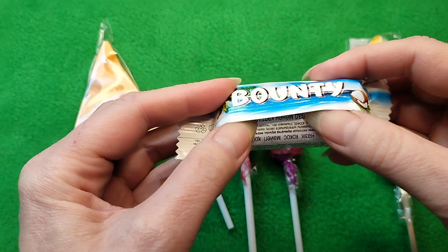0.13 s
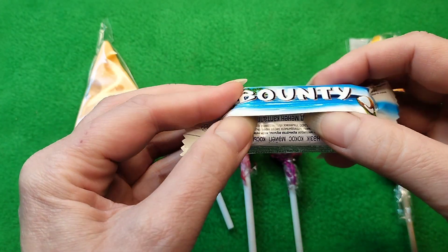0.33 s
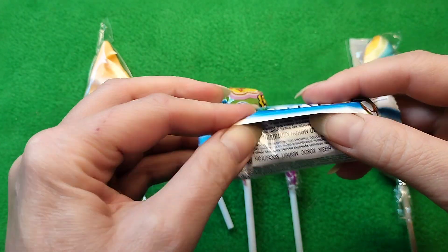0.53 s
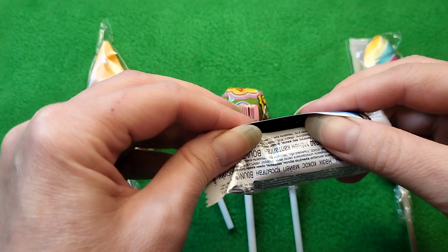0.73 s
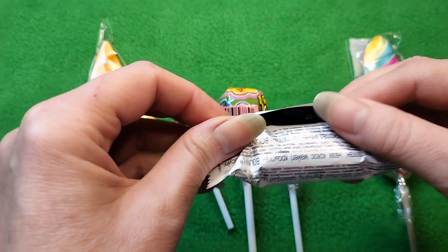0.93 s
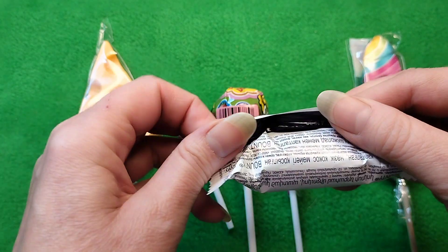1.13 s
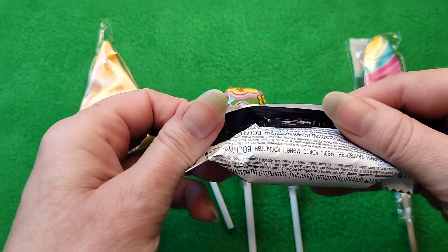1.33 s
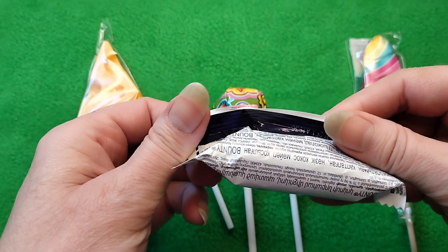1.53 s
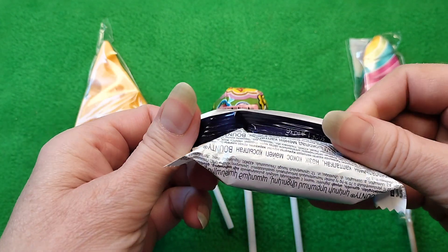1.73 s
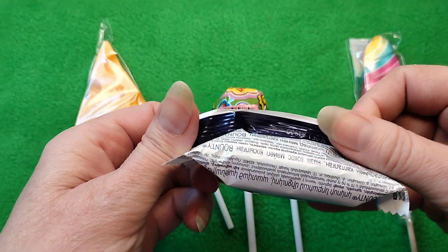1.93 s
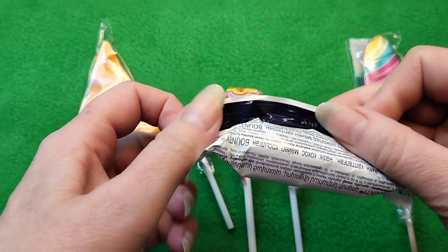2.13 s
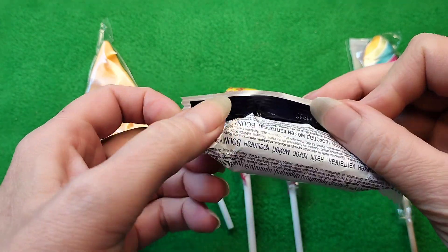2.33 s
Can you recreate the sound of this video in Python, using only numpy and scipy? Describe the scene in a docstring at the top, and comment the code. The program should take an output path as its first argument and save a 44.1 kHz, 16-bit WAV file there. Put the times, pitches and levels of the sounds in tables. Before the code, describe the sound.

A plastic candy wrapper crinkles close to the microphone as fingers pinch and turn it. Scattered sharp snaps thicken from about 0.4 seconds and are loudest between 0.6 and 1.1, with faint rustling and occasional soft pops. The crackling continues unevenly until 1.7, almost stops, then returns in a flurry from 2.0 to 2.2 seconds. Light rubbing and a couple of small ticks follow. The room is quiet.

```python
"""Candy wrapper, close up

Fingers turn and pinch a plastic-wrapped candy bar close to a stereo microphone in a quiet room.
Creases buckle with sharp snaps, each ringing the film beside it; now and then a whole panel pops
through with a soft thump. In between, the film crackles and rubs faintly, over a low mains hum."""
import sys
import numpy as np
from scipy import signal
from scipy.fft import rfft, irfft
from scipy.io import wavfile

SR = 44100
rng = np.random.default_rng(int(sys.argv[2]) if len(sys.argv) > 2 else 0)


def log_audio(samples):
    """Write samples as a 16-bit WAV file to the path given in sys.argv[1]."""
    # one column per channel
    frames = np.atleast_2d(samples).T
    # limit to full scale, then quantise
    limited = np.clip(frames, -1, 1)
    pcm = np.round(limited * 32767).astype(np.int16)
    wavfile.write(sys.argv[1], SR, pcm)


N = 110250


def from_db(db):
    """Decibels to gain."""
    return 10 ** (np.asarray(db) / 20)


def unit(x):
    """Scale to a mean energy of one per channel."""
    return x / np.sqrt(np.mean(np.sum(x ** 2, axis=-1)) + 1e-24)


def panned(db):
    """Constant-power gains, the left db above the right."""
    gains = from_db([[db / 2], [-db / 2]])
    return gains / np.sqrt(np.mean(gains ** 2))


def colour(x, points):
    """Minimum-phase filter through (frequency [Hz], gain [dB]) points."""
    size = 4096
    hz, db = np.transpose(points)
    gain = from_db(np.interp(np.log(np.fft.rfftfreq(size, 1 / SR) + 1), np.log(hz), db))
    cepstrum = irfft(np.log(gain))
    cepstrum[1:size // 2] *= 2
    cepstrum[size // 2 + 1:] = 0
    response = irfft(np.exp(rfft(cepstrum)))[:size // 2]
    return signal.fftconvolve(x, response[None], axes=-1)[:, :x.shape[-1]]


def resonate(x, hz, q):
    """One resonance with gain one at its peak."""
    return signal.lfilter(*signal.iirpeak(hz, max(q, 1), fs=SR), x)


def cut(x, hz, kind):
    """Second-order low- or high-pass."""
    return signal.lfilter(*signal.butter(2, hz, kind, fs=SR), x)


def add(out, time_s, sound):
    """Mix a sound in at a time."""
    start = int(np.clip(time_s * SR, 0, N - 1))
    out[:, start:start + sound.shape[-1]] += sound[:, :N - start]


# still air around the microphone: (frequency [Hz], gain [dB])
AIR_COLOUR = [(25, -16), (150, -1), (400, -0.5), (1000, -11), (3000, -27.5), (16000, -33.5)]


def room_tone():
    """Still air and a faint mains hum, a little to the left."""
    air_db, hum_db, hum_hz = -88.5, -83, 99.8
    air = np.sqrt(N) * unit(colour(rng.standard_normal((2, N)), AIR_COLOUR))
    hum = np.sqrt(2) * np.sin(2 * np.pi * hum_hz * np.arange(N) / SR)
    return from_db(air_db) * air + from_db(hum_db) * panned(db=6.5) * hum


# film crackling and sliding close to the microphone: (time [s], level [dB])
HANDLING_LEVEL = [(0, -61), (.055, -73), (.1, -67), (.22, -67), (0.279, -60), (0.33, -86), (.372, -80),
                  (0.44, -55), (.52, -70), (0.659, -50), (.78, -65), (.845, -70), (0.888, -56), (.99, -61),
                  (1.042, -53), (1.13, -75), (1.28, -66), (1.38, -58), (1.5, -60), (1.55, -70), (1.68, -63),
                  (1.75, -86), (1.82, -74), (1.97, -92), (2.07, -70), (2.17, -54), (2.299, -66),
                  (2.36, -58), (2.439, -69), (2.5, -55)]
# tone of that crackle and hiss: (frequency [Hz], gain [dB])
CRACKLE_COLOUR = [(200, -19.5), (600, -20.5), (950, -4), (1600, -10), (2500, 1), (3200, -7.5), (4100, 0.5),
                  (5000, -6.5), (7200, 0.5), (8500, -14.5), (10000, -34.5), (15500, -31)]


def crackle():
    """Tiny creases give way at random over the hiss of sliding film, a little to the right."""
    creases_per_s, spread_db, decay_s, grain_db = 90, 4, .00052, -2
    glide_start_s, glide_end_s = 2.23, 2.46   # fingers glide without bending the film: hiss only
    t = np.arange(N) / SR
    level = from_db(np.interp(t, *np.transpose(HANDLING_LEVEL)))
    bending = (t < glide_start_s) | (t > glide_end_s)
    sizes = from_db(spread_db * np.minimum(rng.exponential(1, N), 2))
    kicks = (rng.random(N) < creases_per_s / SR) * sizes * bending
    bursts = signal.lfilter([1], [1, -np.exp(-1 / (decay_s * SR))], kicks + 1e-18)
    quivers = bursts * (rng.standard_normal(N) + .7 * rng.standard_normal((2, N)))
    grains = unit(colour(quivers, CRACKLE_COLOUR))
    hiss = unit(colour(rng.standard_normal((2, N)), CRACKLE_COLOUR))
    return level * panned(db=-6) * np.sqrt(N) * (from_db(grain_db) * grains + hiss)


# creases buckling close to the microphone: (time [s], energy [dB], panel pitch [Hz],
# facet pitch [Hz], length [ms], left over right [dB], treble over body [dB])
CREASE_SNAPS = [(0.0106, -23, 870, 7200, 0.6, -5, 12), (0.0824, -28),
                (0.1166, -16, 2370, 4120, 0.67, -8, 4), (0.158, -34),
                (0.1747, -12, 2800, 6400, 0.087, -11.5, 43), (0.2471, -27.5, 3060, 7000, 0.13, -6, 28),
                (0.2892, -12.5, 2320, 7300, 0.96, -4, 5.5), (0.3797, -12.5, 3300, 5670, 0.6, -12.5, 28),
                (0.388, -26.5), (0.3995, -28), (0.4166, -8.5, 1700, 3630, 0.8, -6, 3.5),
                (0.4238, -15, 2500, 5460, 1.1, 5, 4.5), (0.4298, -12, 2900, 6900, 0.4, -2, 14),
                (0.4338, -20, 2710, 5500, 0.77, -17, -8), (0.4422, -15.5, 2960, 4300, 0.37, -11, 2),
                (0.449, -27), (0.454, -20), (0.4591, -17.5, 2580, 3790, 0.77, -1.5, 5), (0.4737, -28),
                (0.5402, -15.5, 2870, 6900, 0.78, -5, 15), (0.558, -30), (0.5662, -27), (0.5817, -23),
                (0.6038, -8, 2500, 6300, 0.44, -7, 7), (0.6457, -23.5),
                (0.658, -11.5, 2230, 7020, 1.8, 0.5, 5.5), (0.665, -14, 1720.0, 5730, 0.8, -20.5, 10.5),
                (0.6833, -8.5, 1250, 4300, 1.1, -5, 7), (0.6858, -14, 1150, 3300, 1, -1, -6), (0.6955, -24),
                (0.7037, -6.5, 1000, 5400, 0.7, -6, 15), (0.7299, -12, 1240, 6200, 1.7, -21, 9),
                (0.7313, -4.5, 1750, 6930.0, 0.4, -1.5, 9.5), (0.7925, -18.5, 3040, 5930, 1, -11, 1.5),
                (0.8204, -22.5), (0.8545, -25), (0.8735, -21, 2450, 3420, 1.4, -4, -6.5), (0.8807, -18.5),
                (0.9227, -2.5, 1846, 7000, 0.6, 0, 7), (0.9523, -17.5, 3030, 7400, 0.52, -9, 31),
                (1.009, -22), (1.0267, -11, 3300, 3800, 0.9, -6, 14), (1.0493, -10, 1630, 3400, 2.1, -3, 1),
                (1.053, -9, 1520, 3950, 0.7, -4, 7), (1.062, -20), (1.1413, -29.5),
                (1.1673, -29.5, 1057, 4200, 0.8, -2, -4), (1.1846, -23, 1030, 3970, 1.4, 1, -3),
                (1.269, -33), (1.3176, -15.5, 2750, 7000, 0.63, -0.5, 5),
                (1.3216, -13, 2500, 3180, 0.87, -10, 7), (1.3345, -10, 2540, 4000, 0.55, -5, 2),
                (1.3624, -20.5, 2440, 4300, 2.2, 2, -6), (1.3777, -21),
                (1.3865, -9.5, 1800, 3500, 0.9, -5, -2), (1.4314, -20.5),
                (1.4597, -18.5, 2450, 2600, 0.9, 1, -16), (1.4889, -20, 2550, 6000, 1.3, -7.0, 1),
                (1.5757, -31.5), (1.6067, -28), (1.6171, -8.5, 2540, 2700, 0.5, -6, -1),
                (1.653, -16, 1900, 3500, 0.56, -4, 3), (1.6995, -15.5, 3300, 7200, 0.45, -6, 10),
                (1.8492, -43.5), (1.8922, -30.5, 3000, 7300, 0.7, -4, 24),
                (2.0088, -23, 2670, 7210, 0.7, -5, 3), (2.0154, -18.5, 2810, 7600, 0.42, -13, 3),
                (2.0218, -17.5, 1080.0, 5840, 0.79, 8, 9.5), (2.0347, -30), (2.099, -32),
                (2.1355, -11, 2520, 3400, 1.2, -1, -2), (2.145, -22),
                (2.1656, -23.5, 1080.0, 3340, 0.62, 5, -21), (2.1992, -12.5, 1140, 7200, 0.6, -4.5, 1.5),
                (2.2279, -16, 2500, 7950, 0.3, 0.5, 1), (2.4555, -31), (2.4781, -23)]
# light snaps, the rows with only time and energy, share these: (panel pitch [Hz],
# facet pitch [Hz], length [ms], left over right [dB], treble over body [dB])
LIGHT_SNAP_SHAPE = (2700, 7000, 0.7, -4.5, 9)
# tone of the snapping film: (frequency [Hz], gain [dB])
SNAP_COLOUR = [(200, -28), (550, -27), (950, -9), (1800, -3.5), (2600, -3), (3200, -3.5), (4000, -0.5),
               (5000, -3), (7200, -0.5), (8200, -7), (9700, -17), (15500, -24)]


def snaps():
    """A crease quivers, gives way with a click and quivers on, ringing a wide panel and a small facet."""
    quiver_db, shared = 3.5, .66   # against the click, for a 1 ms snap; power common to both sides
    build_up, die_away = .65, 1.57   # time constants, in snap lengths
    panel_db, facet_db = 10, 8
    panel_width_hz, facet_width_hz = 340, 900   # broad, because the fingers damp the film
    treble_hz, travel_s = 3250, .0003   # a bending wave at this pitch crosses the film in this time
    lag_spread_s = .00007   # creases lie at different places, so one side hears each first
    size, lead_s = 1024, .003
    out = np.zeros((2, N))
    t = (np.arange(size) - int(lead_s * SR)) / SR
    hz = np.fft.rfftfreq(size, 1 / SR)
    dispersion = np.exp(-4j * np.pi * travel_s * np.sqrt(treble_hz * hz))   # highs arrive first
    for time_s, db, *shape in CREASE_SNAPS:
        panel_hz, facet_hz, length_ms, pan_db, treble_db = shape or LIGHT_SNAP_SHAPE
        length_s = max(length_ms, .1) / 1000
        envelope = np.exp(-abs(t) / (length_s * np.where(t < 0, build_up, die_away)))
        common = np.sqrt(shared) * rng.standard_normal(size)
        separate = np.sqrt(1 - shared) * rng.standard_normal((2, size))
        quiver = from_db(quiver_db) * length_ms * unit((common + separate) * envelope)
        click = colour((t == 0) + quiver, SNAP_COLOUR)
        panel = from_db(panel_db) * resonate(click, panel_hz, panel_hz / panel_width_hz)
        facet = from_db(facet_db) * resonate(click, facet_hz, facet_hz / facet_width_hz)
        wave = irfft(rfft(click + panel + facet) * dispersion)
        body = unit(cut(cut(wave, treble_hz, "low"), treble_hz, "low"))
        treble = unit(cut(cut(wave, treble_hz, "high"), treble_hz, "high"))
        left, right = body + from_db(treble_db) * treble
        lag = int(lag_spread_s * rng.standard_normal() * SR)
        snap = np.array([np.roll(unit(left), max(lag, 0)), np.roll(unit(right), max(-lag, 0))])
        add(out, time_s - lead_s, from_db(db) * panned(pan_db) * snap)
    return out


# panels popping through, mostly on the left: (time [s], level [dB], left over right [dB])
PANEL_POPS = [(0.1175, -36, 28), (0.1751, -40, 14), (.6039, -33.5, -37), (.7315, -28.5, 26),
              (0.9227, -37, 14.5), (1.487, -46.5, 16), (2.0209, -39, 27), (2.2284, -28.5, 24.5)]


def thumps():
    """A flipping panel pushes one lopsided puff of air at the microphone."""
    rise_s = .000096
    out = np.zeros((2, N))
    age = np.arange(SR // 20) / SR / rise_s
    puff = cut(age * np.exp(1 - age), hz=124, kind="high")
    for time_s, db, pan_db in PANEL_POPS:
        add(out, time_s, -from_db(db) * panned(pan_db) * puff)
    return out


# a fingertip dragging over the pack, centred: (peak time [s], half length [s], level [dB])
FINGER_DRAGS = [(0.289, 0.0088, -67.5), (0.687, 0.024, -59.5), (1.187, 0.014, -70.5), (2.19, 0.03, -52),
                (2.274, 0.0072, -58.5)]
# resonances of the hollow pack: (frequency [Hz], gain [dB], Q)
PACK_MODES = [(840, -2, 33), (1081, -4, 6), (1230, -3, 20)]


def drags():
    """Skin friction swells and fades, sounding the hollow of the pack."""
    t = np.arange(N) / SR
    swell = sum(from_db(db) * np.exp(-((t - peak_s) / half_s) ** 2 / 2)
                for peak_s, half_s, db in FINGER_DRAGS)
    friction = rng.standard_normal(N) + .24 * rng.standard_normal((2, N))
    hollow = sum(from_db(db) * resonate(friction, hz, q) for hz, db, q in PACK_MODES)
    return swell * np.sqrt(N) * unit(cut(hollow, hz=750, kind="high"))


# balance of the film at close range: (frequency [Hz], left over right [dB])
SIDE_BALANCE = [(600, 8), (1500, 2.5), (4000, -1), (6500, -3), (9000, 3.5), (13000, 0)]


def microphone_sides(film):
    """The microphone's left and right hear the nearby film in different colours."""
    left = colour(film[:1], [(hz, db / 2) for hz, db in SIDE_BALANCE])
    right = colour(film[1:], [(hz, -db / 2) for hz, db in SIDE_BALANCE])
    return np.vstack([left, right])


# reflections coming back to the microphone: (frequency [Hz], gain [dB])
REFLECTION_COLOUR = [(150, -13), (500, -8), (1000, -6), (2500, -3.5), (5000, -2), (7200, -4.5), (10000, -6),
                     (15000, 1.5)]


def reflections(direct):
    """Quick scatter off the hands and table, then the soft tail of a small room."""
    scatter_db, scatter_s, tail_db, t60_s = -8, .0057, -10, .34
    t = np.arange(SR // 2) / SR
    scatter = unit(rng.standard_normal((2, len(t))) * np.exp(-t / scatter_s) * (t > .001))
    tail = unit(rng.standard_normal((2, len(t))) * from_db(-60 * t / t60_s) * (t > .004))
    blended = .59 * direct + .26 * direct[::-1]   # each side spills into the other
    early = signal.fftconvolve(direct, from_db(scatter_db) * scatter, axes=-1)
    late = signal.fftconvolve(blended, from_db(tail_db) * tail, axes=-1)
    return colour((early + late)[:, :N], REFLECTION_COLOUR)


def scene():
    """The wrapper close to the microphone, the quiet room behind it."""
    film = snaps() + crackle()
    pack = thumps() + drags()
    return microphone_sides(film) + pack + reflections(film + pack) + room_tone()


def record(dry):
    """The highest treble is cut steeply."""
    cutoff_hz = 16400
    return signal.sosfilt(signal.ellip(10, .2, 70, cutoff_hz, fs=SR, output="sos"), dry)


dry = scene()
out = record(dry)
log_audio(out)
```